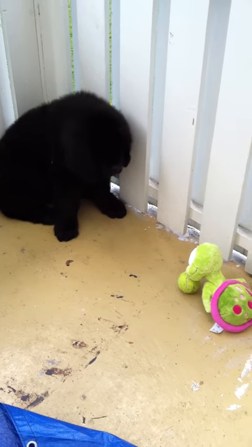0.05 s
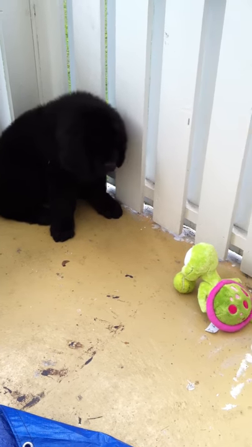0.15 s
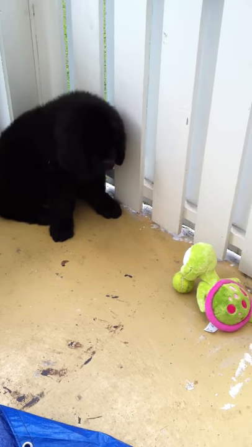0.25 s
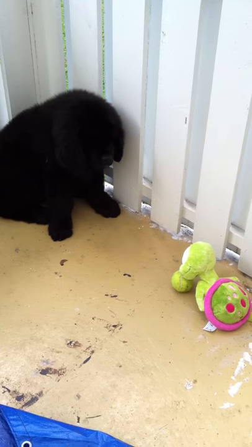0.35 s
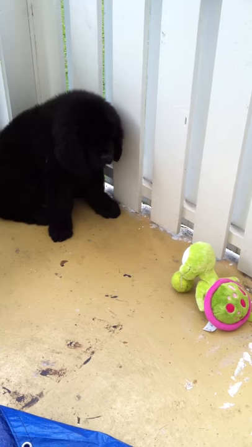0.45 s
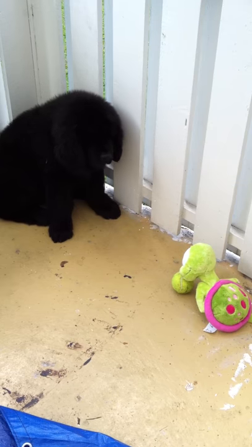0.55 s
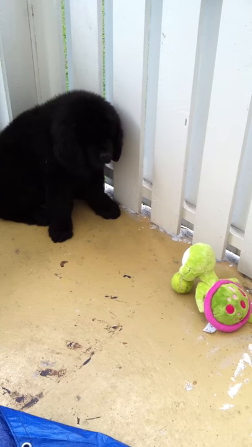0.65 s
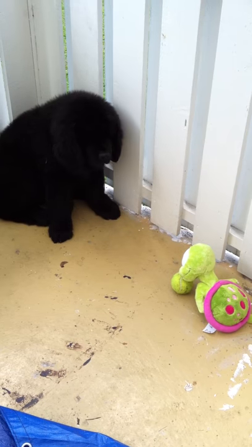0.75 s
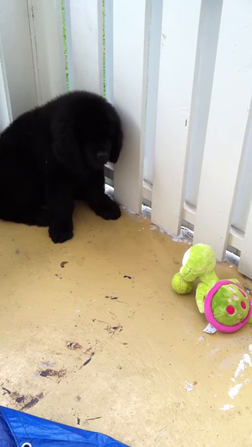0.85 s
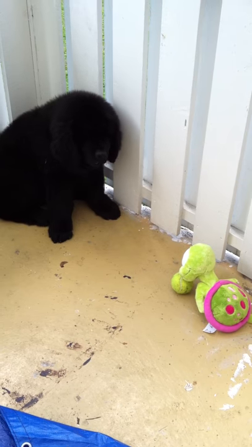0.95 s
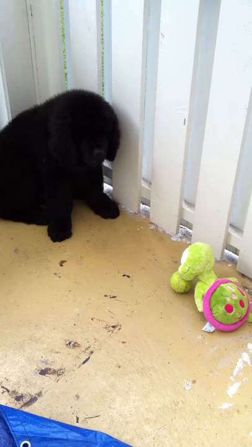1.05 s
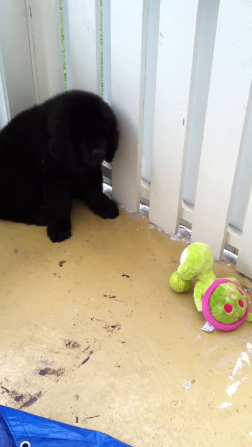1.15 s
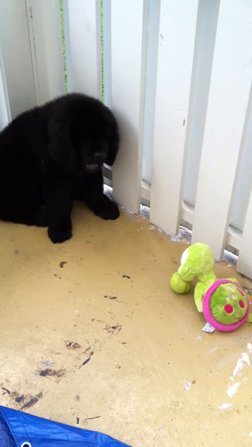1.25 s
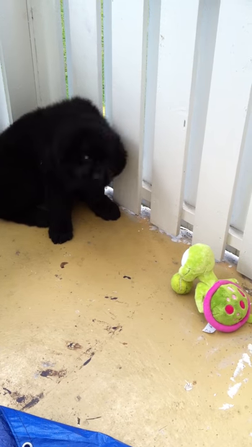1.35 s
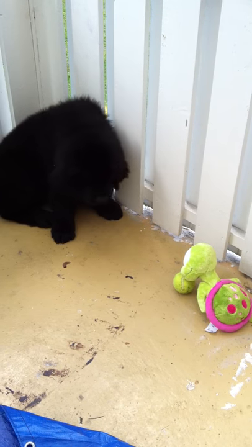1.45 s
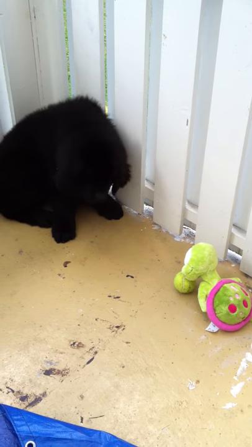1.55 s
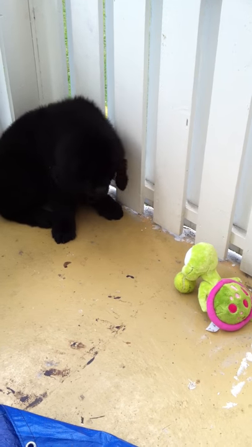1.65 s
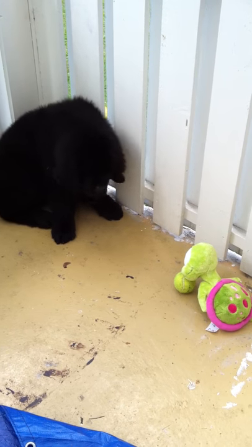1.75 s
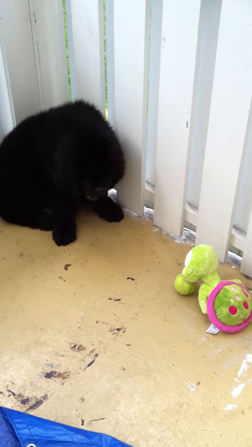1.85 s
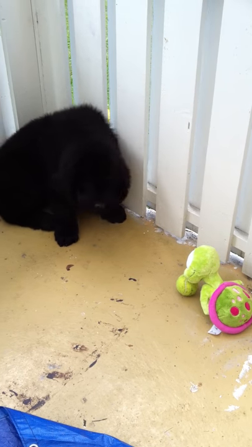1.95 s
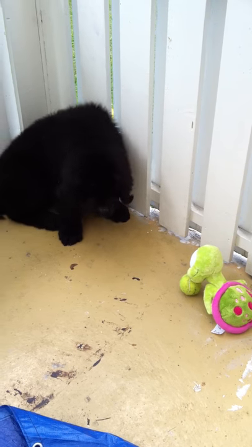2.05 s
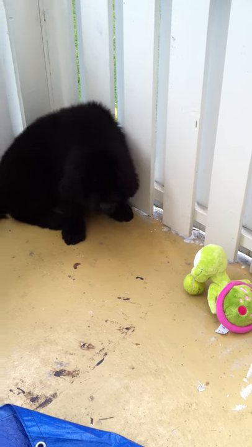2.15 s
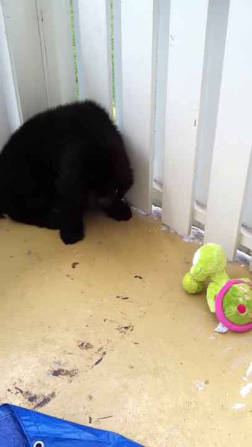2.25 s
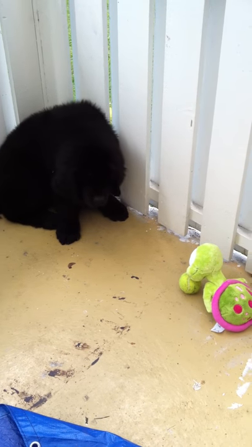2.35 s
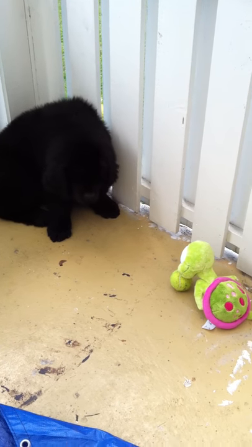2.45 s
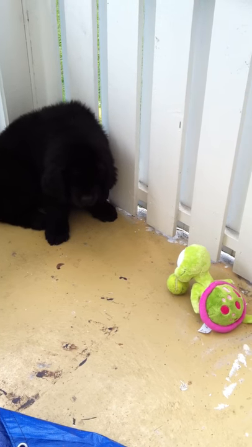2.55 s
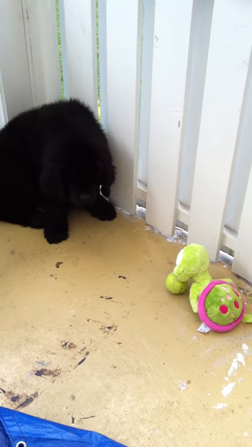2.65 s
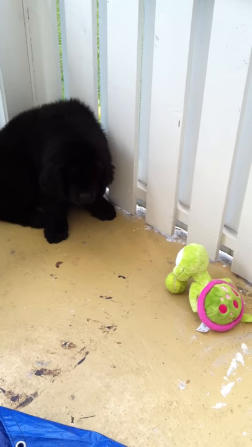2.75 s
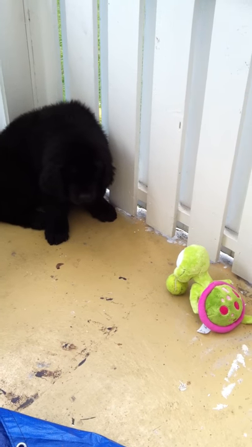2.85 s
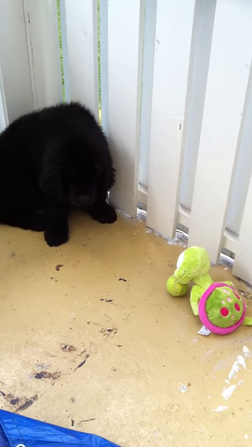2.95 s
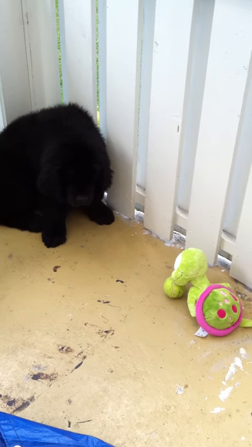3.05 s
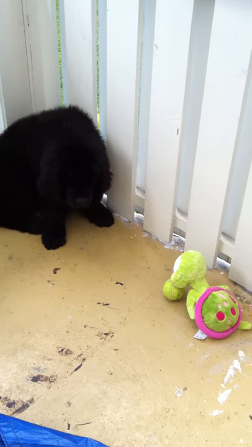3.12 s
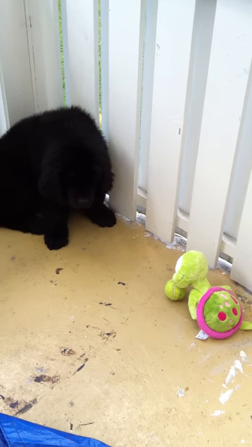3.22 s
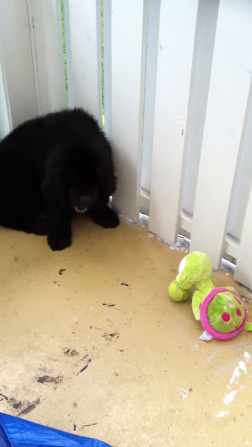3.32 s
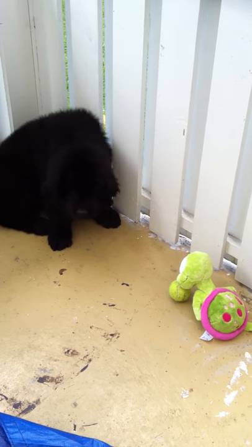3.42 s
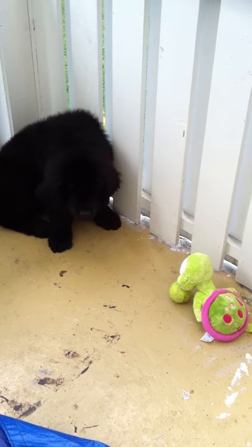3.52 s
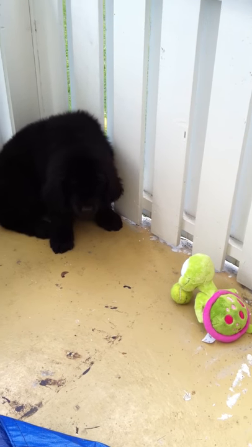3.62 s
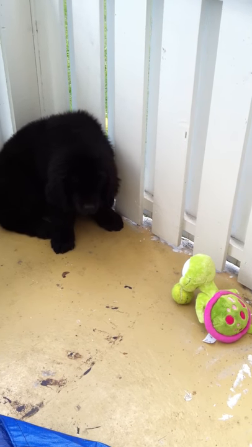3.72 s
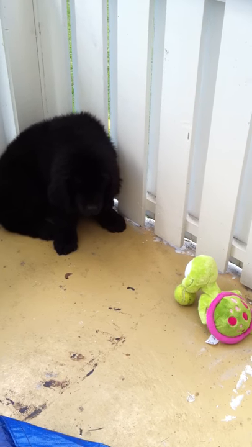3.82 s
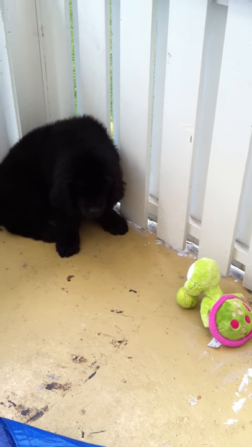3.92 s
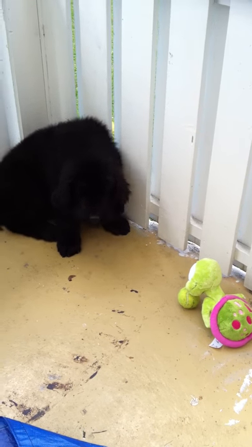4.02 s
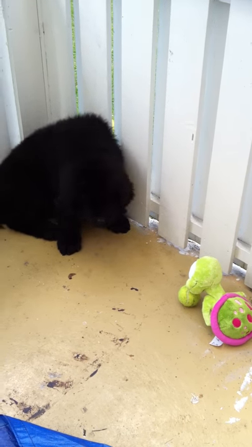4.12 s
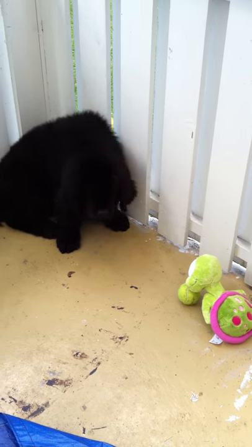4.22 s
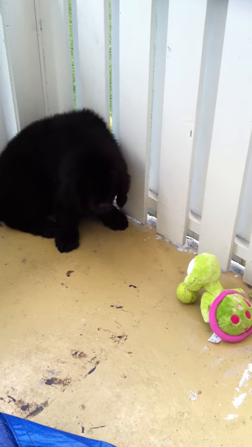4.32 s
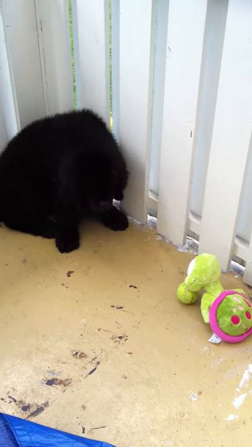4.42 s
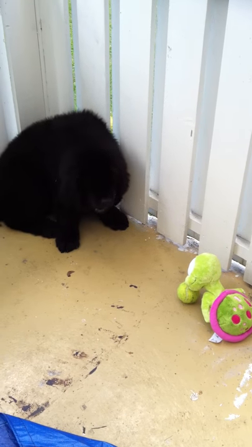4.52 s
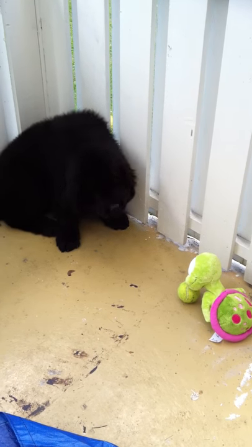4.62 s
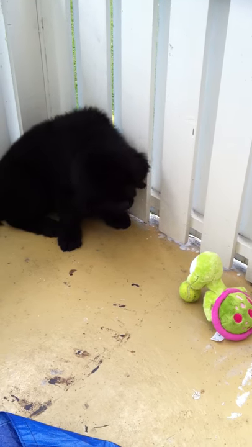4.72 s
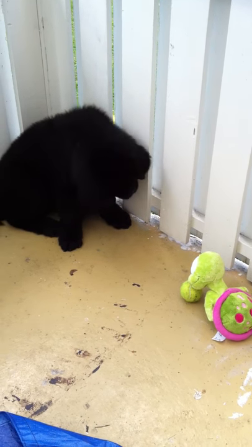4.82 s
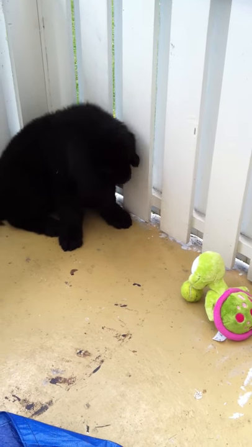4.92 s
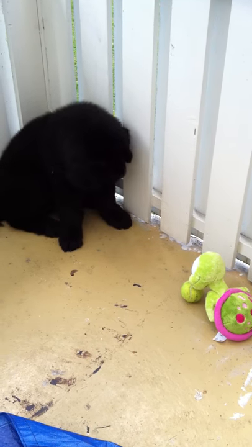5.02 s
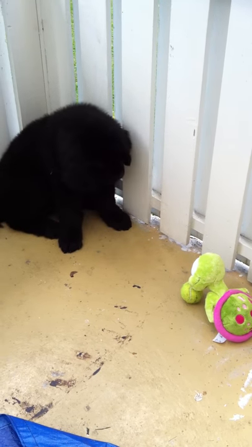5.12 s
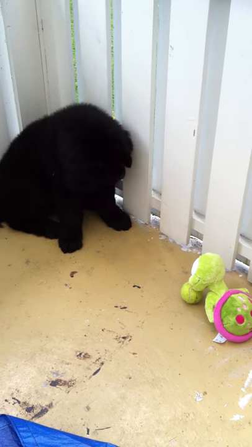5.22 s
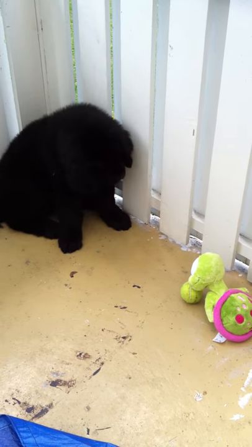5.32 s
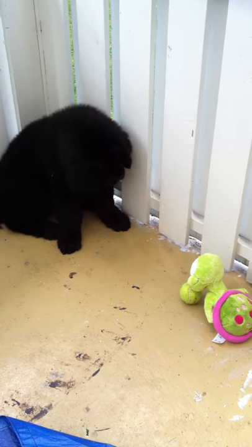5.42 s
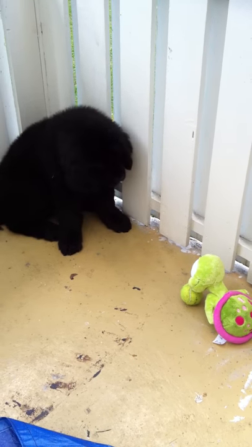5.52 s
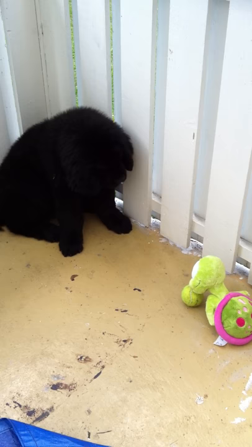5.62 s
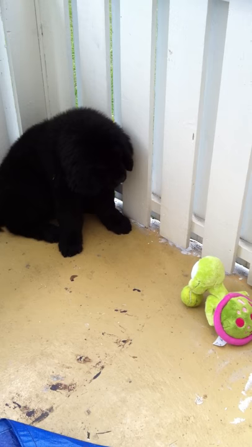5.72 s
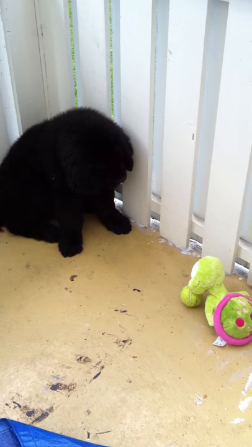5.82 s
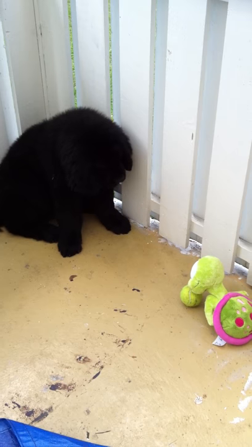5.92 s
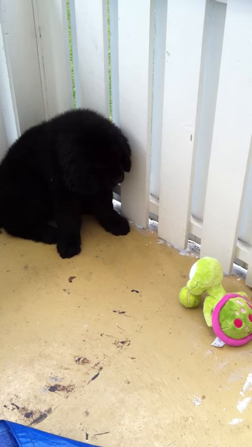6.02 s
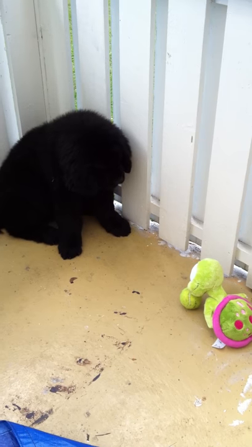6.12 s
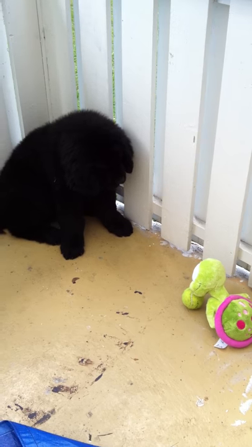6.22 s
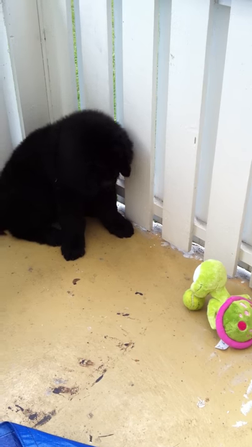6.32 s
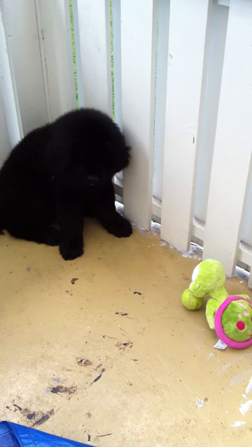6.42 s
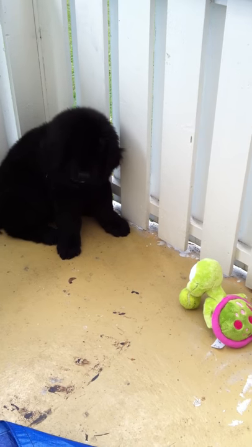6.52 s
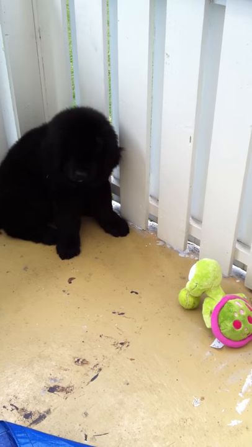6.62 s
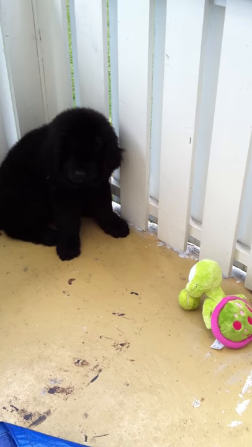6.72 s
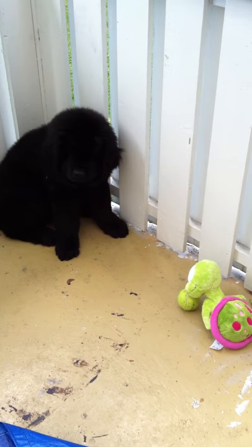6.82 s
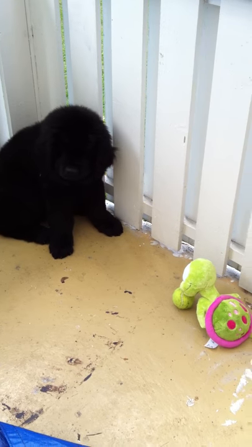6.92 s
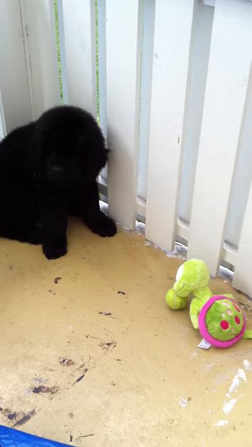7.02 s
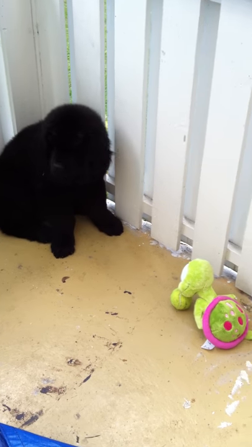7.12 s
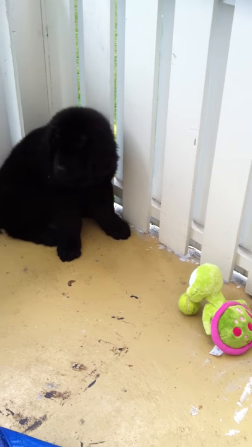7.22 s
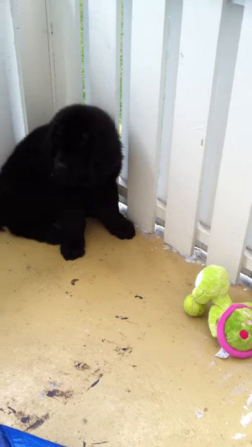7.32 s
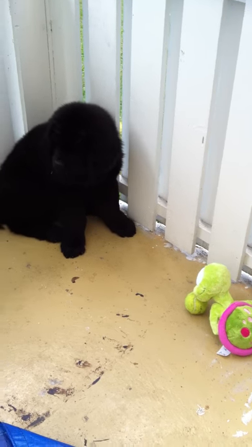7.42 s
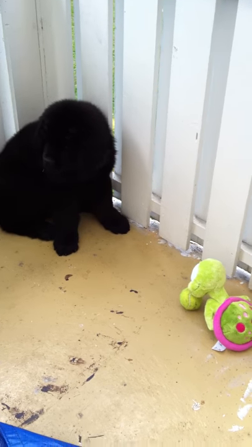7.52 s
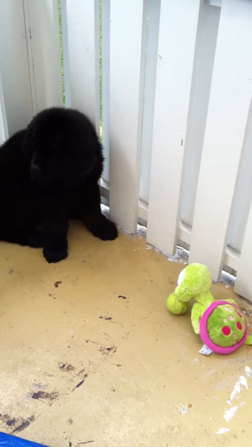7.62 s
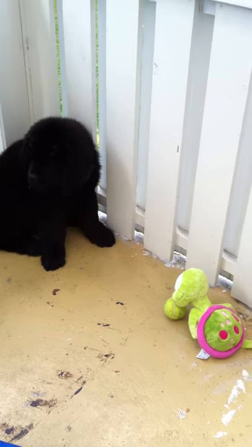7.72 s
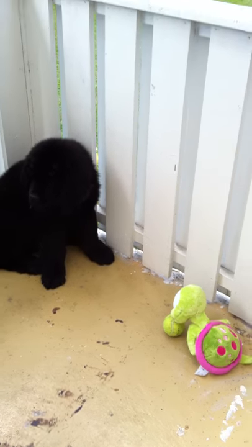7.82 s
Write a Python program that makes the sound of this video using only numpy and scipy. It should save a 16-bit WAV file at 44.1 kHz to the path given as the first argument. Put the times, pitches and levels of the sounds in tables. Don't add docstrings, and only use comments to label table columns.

```python
import sys
import numpy as np
from scipy import signal
from scipy.fft import rfft, irfft
from scipy.io import wavfile
from scipy.ndimage import uniform_filter1d

SR = 44100
rng = np.random.default_rng(int(sys.argv[2]) if len(sys.argv) > 2 else 0)


def nominal_scale(level):
    x = np.asarray(level, float) / 20
    return 10 ** x


def file_out(sig):
    cols = np.atleast_2d(sig).T
    lim = np.clip(cols, -1, 1)
    pcm = np.round(lim * 32767).astype(np.int16)
    wavfile.write(sys.argv[1], SR, pcm)


N = 346626

# seconds after the start, roughness (0-1), share of half-rate pulses (0-1).
FOLDS = [(-.01, .75, .2), (.01, .22, 0.3), (.04, .25, .3), (.065, .4, 0.5), (.11, .6, .5), (.18, 0.2, .15)]


def gesture(voice, peak_db, rise_s, hold_s, fall_db):
    lead_s, lead_db, onset_db, bark_s = .022, -56, -17, .195
    t = np.arange(-lead_s, bark_s, 1 / SR)
    controls = []
    for table in (voice, FOLDS):
        s, *columns = np.transpose(table)
        controls += [np.interp(t, s, c) for c in columns]
    below_db = np.interp(t, [-lead_s, 0, rise_s], [lead_db, onset_db, 0])
    below_db = below_db - fall_db * np.maximum(t - rise_s - hold_s, 0)
    hiss_db = -25.5 - 0.19 * below_db
    chest_db = -58 + 17.5 * np.exp(-((t - 0.151) / .04) ** 2)
    return [t, *controls, peak_db + below_db, hiss_db, chest_db]


# centre in Hz, width in Hz, level in dB.
THROAT = [(1202, 304, -4.5), (1659, 280, 2), (2270, 665, -7), (3150, 950, -21), (4460, 620, -29.5)]
# frequency in Hz, level in dB.
PALATE = [(3800, -16.5), (5000, -5), (6200, 8), (7400, 5), (9000, 5), (10200, 1.5), (11300, -7),
          (13000, -10), (14500, -10.5), (15800, -6)]


def bark(voice, start, *effort):
    t, hz, mouth, rough, half, effort_db, hiss_db, chest_db = gesture(voice, *effort)
    size = len(t)
    turns = np.cumsum(hz * (1 + .11 * rough * wobble(size, 63.7))) / SR

    folds = np.zeros(size)
    for k in range(1, 16):
        flicker = nominal_scale(3.9 * wobble(size, 230))
        folds += np.cos(2 * np.pi * k * turns + 0.465 * k * k) * flicker / k ** 0.41
    folds = folds * (1 + half * np.cos(np.pi * turns))
    gate = 0.42 + np.exp(-(turns % 1) / 0.42)
    puffs = evened(gate * rng.standard_normal(size))
    drive = (1 - rough) * evened(folds) + 0.7 * rough * puffs
    drive = drive - 0.91 * mouth * resonate(drive, hz, 260)

    shut_hz, open_hz, width_hz = 180, 1101, 198
    mouth_hz = shut_hz + (open_hz - shut_hz) * mouth
    throat = nominal_scale(1.5) * resonate(resonate(drive, mouth_hz, width_hz), mouth_hz, 2.4 * width_hz)
    bright_db = 0.11 * (effort_db - effort_db.max())
    for k, (f, width, db) in enumerate(THROAT):
        f = f * (0.9065 + 0.16 * mouth)
        formant = resonate(resonate(drive, f, width), f, 1.02 * width)
        throat = throat - (-1) ** k * nominal_scale(db + bright_db * k / 2) * formant
    throat = throat / np.sqrt(uniform_filter1d(throat ** 2, 900) + 1e-6)

    puffed = evened(gate * nominal_scale(2.1 * wobble(size, 92)))
    hiss = nominal_scale(hiss_db) * puffed * patchy(coloured(PALATE, size), 13.0)
    low_register = np.clip((262 - hz) / 70, 0, 1)
    chest = nominal_scale(chest_db) * low_register * np.sqrt(2) * np.sin(2 * np.pi * turns)
    sound = nominal_scale(effort_db + 1.5) * (throat + hiss) + chest
    return start + t[0], sound * signal.windows.tukey(size, .05)


# start in seconds, peak effort in dB, rise in seconds, hold in seconds, fall in dB per second.
BARKS = [
    (1.432, -9, 0.02, .034, 310),
    (2.014, -9.5, 0.023, .036, 310.5),
    (3.47, -10, 0.025, .036, 289.5),
    (4.097, -8.5, 0.026, .016, 260),
    (4.691, -8.5, 0.022, .012, 290),
]
# seconds after the start, pitch in Hz, mouth opening (0-1).
VOICE = [
    [(-.005, 299.1, .6), (.009, 325.3, .93), (.029, 394.4, .79), (.059, 379, 0.61), (.074, 402.5, 0.94),
     (.089, 255, 0.46), (.139, 188, .05), (.18, 159.4, 0.1)],
    [(-.009, 290, .92), (.011, 323, .8), (.026, 385.4, 0.77), (.056, 405.5, 0.7), (.068, 299, 0.58),
     (.121, 253.7, 0.36), (.141, 191, 0.03), (.186, 159.8, 0.31)],
    [(.005, 251, .68), (.02, 344.9, 0.74), (.035, 393.6, .62), (.06, 420.9, 1), (.085, 415, 0.38),
     (.105, 266.2, 0.33), (.14, 283.2, .2), (.18, 273.5, 0.02)],
    [(.007, 300.1, .8), (.024, 379.1, 0.72), (.052, 414, .66), (.065, 428, 1), (.077, 279.8, 0.45),
     (.107, 271.8, 0.57), (.13, 202.6, 0.06), (.182, 157.4, 0.11)],
    [(0, 257.3, 0.57), (.02, 303.3, .81), (.047, 375.8, 0.54), (.07, 425.4, 1), (.09, 388.6, 0.22),
     (.11, 271.3, 0.26), (.13, 192.5, 0.22), (.19, 146, 0.14)],
]


def barks():
    out = np.zeros(N)
    for voice, row in zip(VOICE, BARKS):
        add(out, *bark(voice, *row))
    return out


# time in seconds, flaps of the folds per second, flap level in dB.
GROWL = [(5.405, 24.3, -40), (5.62, 22.4, -37.5), (5.98, 20.5, -37.5), (5.99, 26, -38), (6.035, 25, -44),
         (6.07, 24, -38.5), (6.12, 26, -38.5), (6.14, 41.4, -40.5), (6.31, 42, -45)]
# frequency in Hz, level in dB, t60 in seconds.
CHEST = [(173.5, -1.5, 0.061), (290, -9.5, 0.07), (379, -4.5, 0.056)]
FLAP_SCATTER_DB = (1.1, 3.5, 2.1)


def growl():
    s, rate, db = np.transpose(GROWL)
    t = np.arange(s[0], s[-1], 1 / SR)
    rate, db = np.interp(t, s, rate), np.interp(t, s, db)
    at = np.flatnonzero(np.diff(np.floor(np.cumsum(rate) / SR), prepend=-1))
    since = t[at] - t[0]
    nose_db = np.maximum(4 - 150 * abs(since - .042), -10)
    lip_db = -19.5 - 22 * since
    scatter_db = (FLAP_SCATTER_DB * rng.standard_normal((len(at), 3))).T
    flaps = np.zeros((3, N))
    flaps[:, np.round(t[at] * SR).astype(int)] = nominal_scale(db[at] + [0 * since, nose_db, lip_db] + scatter_db)
    chest = ring(CHEST, 0.005)
    nasal = ring([(746, 0.5, 0.056), (995, 0.5, 0.039)], 0.0075)
    lips = ring([(5900, -5, 0.024), (6330, -4.0, 0.029), (6740, -10, .02), (7150, -8, 0.026)], 0.0012)
    return nominal_scale(1.5) * sum(signal.oaconvolve(train, body)[:N] for train, body in zip(flaps, (chest, nasal, lips)))


# start, strongest moment and end in seconds, level in dB, number of the nose colour.
SNIFFS = [
    (0, .012, .075, -62.5, 0),
    (0.068, 0.109, .17, -62.5, 0),
    (.91, 0.984, 1.05, -58, 1),
    (2.75, 2.84, 2.98, -69, 2),
]
# resonance in Hz, width in Hz, level in dB.
NOSE = [
    [(527, 39, 12), (2570, 620, 7), (5050, 1800, 5), (11000, 7000, 0)],
    [(577, 500, 11), (1100, 190, 7), (2080, 700, 3), (3450, 280, -3), (4330, 230, -10), (11000, 7000, -8)],
    [(2570, 700, 9.5), (1460, 870, 7)],
]


def sniffs():
    out = np.zeros(N)
    for *row, colour in SNIFFS:
        t, db = swell(*row, rise_db=11, fall_db=15)
        air = rng.standard_normal(len(t))
        nasal = sum(nominal_scale(g) * evened(resonate(resonate(air, f, w), f, w)) for f, w, g in NOSE[round(colour)])
        add(out, t[0], nominal_scale(db - 9.5) * nasal * signal.windows.tukey(len(t), .2))
    return out


# start, strongest moment and end in seconds, level in dB.
SNEEZE = (2.51, 2.59, 2.65, -47.5)
# frequency in Hz, level in dB.
SNEEZE_COLOUR = [(100, -6), (300, 20.5), (700, 14.5), (1300, 6.5), (2500, 16.5), (3600, 0.5), (5700, 10.5),
                 (8000, 0), (9300, 0.5), (11000, 3.5), (15700, 0)]
# start in seconds, peak in dB, centre in Hz, width in octaves, t60 in seconds.
SPITS = [
    (2.5516, -69, 2970, 1.9, 0.0087),
    (2.567, -38, 3000, 1.6, 0.0074),
    (2.5794, -44, 1810, 1.8, 0.0097),
    (2.594, -18.5, 2320, 1.6, 0.0058),
    (2.5984, -60, 2410, 1.6, 0.008),
    (2.609, -40, 1980, 1.6, 0.01),
]


def sneeze():
    t, db = swell(*SNEEZE, rise_db=31, fall_db=26.5)
    flutter = nominal_scale(3.2 * wobble(len(t), 47))
    blast = evened(flutter * patchy(coloured(SNEEZE_COLOUR, len(t)), 3.0))
    out = ticks(SPITS)
    add(out, t[0], nominal_scale(db + 7.5) * blast * signal.windows.tukey(len(t), .1))
    return out


# time in seconds, peak in dB.
KNOCK = [
    (7.2566, -30),
]
# frequency in Hz, level in dB, t60 in seconds.
WOOD = [(1197, 3, 0.062), (1370, 0, 0.084), (1540, 9.5, 0.027), (2020, -6, .06), (2260, -12, .05)]


def knock():
    out = np.zeros(N)
    for s, db in KNOCK:
        add(out, s, nominal_scale(db - 8.5) * ring(WOOD))
    return out


# frequency in Hz, t60 in seconds.
PORCH = [(150, .3), (400, .4), (1000, 0.45), (2500, .36), (5000, 0.44), (12000, 0.35)]
# frequency in Hz, width in Hz, level in dB.
CORNER = [(290, 65, -12.5), (507, 130, -15.5), (740, 55, -19), (1297, 42, -10), (1987, 180, -12.5)]
# delay in seconds, level in dB.
ECHOES = [(.0012, -17), (.0047, -12.5), (.0083, -12), (.0131, -15), (.019, -13.5)]


def porch(x):
    taps = np.zeros(SR)
    at = np.arange(300, SR - 20, 20) + rng.integers(0, 20, (SR - 301) // 20)
    taps[at] = rng.choice([-1., 1.], len(at))
    hz, t, z = signal.stft(taps, SR, nperseg=256)
    decay = nominal_scale(-60 * t / read(PORCH, hz)[:, None])
    tail = signal.istft(z * decay, SR, nperseg=256)[1][:SR // 2]
    tail = tail + sum(nominal_scale(db + 13.0) * resonate(tail, f, width) for f, width, db in CORNER)
    answer = nominal_scale(-12.5) * tail / np.linalg.norm(tail)
    answer[0] = 1
    for k, (s, db) in enumerate(ECHOES):
        answer[round(s * SR)] -= (-1) ** k * nominal_scale(db)
    return signal.fftconvolve(x, answer / np.linalg.norm(answer))[:N]


# start in seconds, peak in dB, centre in Hz, width in octaves, t60 in seconds.
TICKS = [(5.144, -71.5, 3130, 1.5, 0.047), (5.161, -56, 3520, 1.4, 0.04), (5.2016, -62, 3150, 1.4, 0.029),
         (5.8318, -49, 3430, 1.1, 0.04), (5.8521, -52, 9250, 1.4, 0.04), (5.8778, -53, 3130, 1.4, 0.04),
         (5.903, -43, 12140, 0.75, 0.04), (6.0435, -47.5, 3470, 1.4, 0.04), (6.2174, -61, 4370, 1.4, 0.04),
         (6.6333, -53, 4560, 0.75, 0.044), (6.8493, -47.5, 6240, 2.7, 0.064),
         (7.1105, -52, 4120, 1.4, 0.032), (7.668, -45, 4860, 1.3, 0.035), (7.8162, -53, 3530, 2, 0.046)]


def ticks(rows):
    out, t = np.zeros(N), np.arange(2048) / SR
    for s, db, hz, octaves, t60 in rows:
        edge = 2 ** octaves
        colour = [(hz / edge ** 2, -36), (hz / edge, -12), (hz, 0), (hz * edge, -12), (hz * edge * 1.3, -40)]
        add(out, s, nominal_scale(db - 6.0 - 60 * t / t60) * coloured(colour, len(t)))
    return out


# start, strongest moment and end in seconds, level in dB.
RUSTLE = [(5.001, 5.042, 5.09, -68.5), (5.18, 5.24, 5.3, -65), (5.38, 5.41, 5.7, -65.5),
          (5.71, 5.753, 5.8, -55.5), (5.78, 5.86, 5.89, -61.5), (5.891, 5.9, 5.97, -59.5),
          (5.979, 6.069, 6.25, -61), (6.622, 6.67, 6.71, -51), (6.679, 6.88, 7.2, -63.5),
          (7.655, 7.673, 7.7, -54.5), (5.398, 6.2, 7.2, -69), (6.401, 7.6, 9.5, -65)]
# frequency in Hz, level in dB.
CLOTH = [(880, -11.5), (1500, 4), (1810, -5.5), (2810, -4), (5930, -9), (6410, -11), (11100, -12),
         (15700, -13)]


def rustle():
    power = np.zeros(N)
    for row in RUSTLE:
        t, db = swell(*row, rise_db=18.5, fall_db=13.5)
        add(power, t[0], nominal_scale(2 * db))
    grains = nominal_scale(2.1 * wobble(N, 50)) * coloured(CLOTH, N)
    return np.sqrt(power) * evened(grains)


# start in seconds, length in seconds, first pitch in Hz, last pitch in Hz, level in dB.
BIRD = [
    (6.91, .05, 5213, 4880, -80),
    (6.965, .125, 4480, 4220, -71),
    (7.14, 0.17, 6120, 5980, -67.5),
    (7.31, 0.18, 5050, 3880, -69.5),
    (7.5, .16, 5570, 6130, -70),
    (7.69, 0.11, 4850, 4070, -68),
]


def bird():
    out = np.zeros(N)
    for start, length, first_hz, last_hz, top_db in BIRD:
        t, db = swell(start, start + .22 * length, start + length, top_db, rise_db=3, fall_db=10)
        glide = np.exp(-((t - start) / (.3 * length)) ** 2)
        hz = last_hz + (first_hz - last_hz) * glide
        turns = np.cumsum(hz * (1 + 0.0176 * wobble(len(t), 84))) / SR
        db = db + 0.5 + 3.2 * wobble(len(t), 150)
        whistle = np.sqrt(2) * np.sin(2 * np.pi * turns)
        add(out, t[0], nominal_scale(db) * whistle * signal.windows.tukey(len(t), .2))
    lag = np.arange(6000) / SR
    trees = rng.standard_normal(len(lag)) * nominal_scale(-60 * lag / 0.4)
    return out + nominal_scale(-0.5) * signal.oaconvolve(out, trees / np.linalg.norm(trees))[:N]


# frequency in Hz, level in dB per Hz.
YARD = [(30, -55), (60, -11), (100, -16.5), (160, -3.5), (300, -5), (450, -9), (750, -1.5), (1200, -4.5),
        (1700, -11.5), (2500, -19), (4000, -29.5), (7000, -32), (12500, -34.5), (15700, -34)]
# time in seconds, level in dB.
YARD_DB = [(0, -58.5), (1.2, -57), (2.2, -59), (3.4, -56.5), (5.0, -59.5), (5.8, -57), (7.86, -56)]


def yard():
    frames, hz = N // 256 + 5, np.fft.rfftfreq(1024, 1 / SR)
    a, b, patches = rng.standard_normal((frames, 513, 3)).T
    patches = evened(uniform_filter1d(uniform_filter1d(patches, 10, 0), 14, 1))
    s, db = np.transpose(YARD_DB)
    swell_db = np.interp(np.arange(frames) * 256 / SR, s, db - db.mean())
    far = np.clip((4500 - hz) / 2000, 0, 1)[:, None]
    z = (a + 1j * b) * nominal_scale(read(YARD, hz)[:, None] + far * (0.56 * patches + swell_db))
    return nominal_scale(db.mean() + 1.5) * evened(signal.istft(z, nperseg=1024, noverlap=768)[1][:N])


def evened(x):
    return x / np.sqrt(np.mean(x ** 2) + 1e-20)


def read(points, hz):
    f, value = np.transpose(points)
    return np.interp(np.log(hz + 1), np.log(f + 1), value)


def add(mix, s, sound):
    part = mix[round(s * SR):][:len(sound)]
    part += sound[:len(part)]


def resonate(x, hz, width):
    turn = np.exp(2j * np.pi * np.cumsum(hz * np.ones(len(x))) / SR)
    r = np.exp(-np.pi * width / SR)
    return 2 * (turn * signal.lfilter([1 - r], [1, -r], x / turn)).real


def coloured(points, size):
    hz = np.fft.rfftfreq(size, 1 / SR)
    return evened(irfft(rfft(rng.standard_normal(size)) * nominal_scale(read(points, hz)), size))


def wobble(size, span):
    return evened(uniform_filter1d(uniform_filter1d(rng.standard_normal(size), int(span)), int(span)))


def ring(modes, rise=0.001, size=4000):
    t = np.arange(size) / SR
    sines = sum(nominal_scale(db - 60 * t / t60) * np.sin(2 * np.pi * hz * t) for hz, db, t60 in modes)
    return (1 - np.exp(-t / rise)) ** 2 * sines


def patchy(x, depth_db):
    hz, t, z = signal.stft(x, SR, nperseg=256, noverlap=192)
    patches = rng.standard_normal((len(t), len(hz))).T
    patches = evened(uniform_filter1d(uniform_filter1d(patches, 3, 0), 24, 1))
    gain = nominal_scale(depth_db * np.minimum(patches, .5))
    return evened(signal.istft(z * gain, SR, nperseg=256, noverlap=192)[1][:len(x)])


def swell(start, top, end, db, rise_db, fall_db):
    t = np.arange(start, min(end, N / SR), 1 / SR)
    before = np.clip((top - t) / (top - start), 0, 1)
    after = np.clip((t - top) / (end - top), 0, 1)
    return t, db - rise_db * before ** 2 - fall_db * after


def scene():
    loud = barks() + knock()
    soft = growl() + sniffs() + sneeze()
    near = ticks(TICKS) + rustle()
    return (porch(loud + 0.31 * soft) + soft + near + bird() + yard())[None]


def low_pass(x):
    return signal.sosfilt(signal.butter(12, 15820, fs=SR, output="sos"), x)


def record(dry):
    cut = signal.sosfilt(signal.butter(4, 85, "high", fs=SR, output="sos"), dry)
    power_db = 10 * np.log10(uniform_filter1d(cut[0] ** 2, 800) + 1e-12)
    over_db = 0.09 * np.maximum(power_db + 37.5, 0)
    recovery_db = np.arange(N) * 5 / SR
    held_db = np.maximum(np.maximum.accumulate(over_db + recovery_db) - recovery_db, 0)
    cut = cut / nominal_scale(uniform_filter1d(held_db, 400))
    cut = cut + 0.0046 * cut ** 2
    limited = cut / (1 + abs(cut / .72) ** 7) ** (1 / 7) - .0001
    return low_pass(limited)


dry = scene()
out = record(dry)
file_out(out)
```